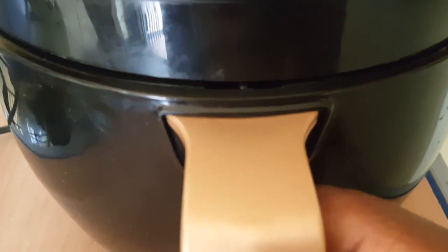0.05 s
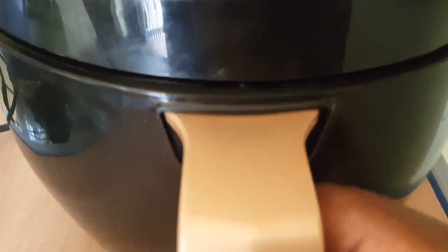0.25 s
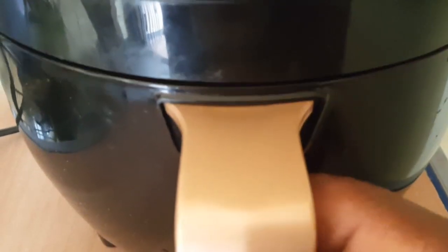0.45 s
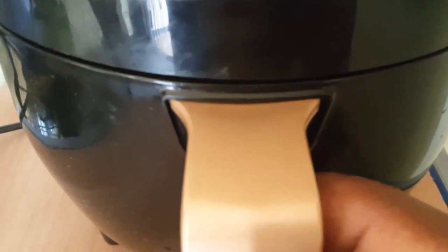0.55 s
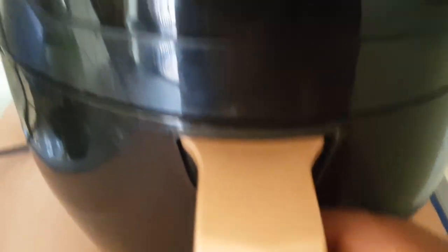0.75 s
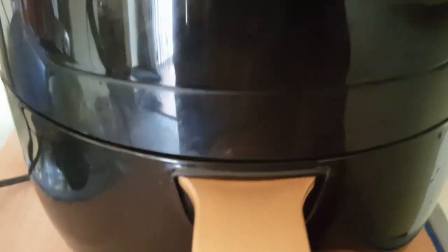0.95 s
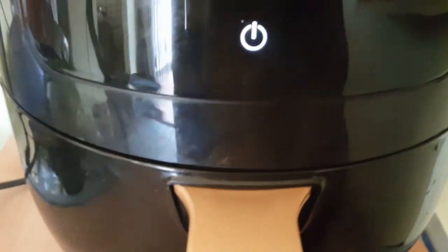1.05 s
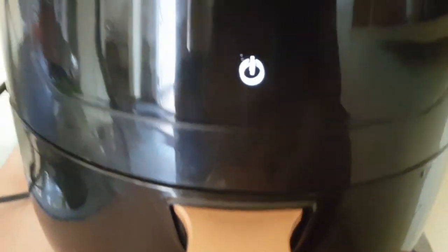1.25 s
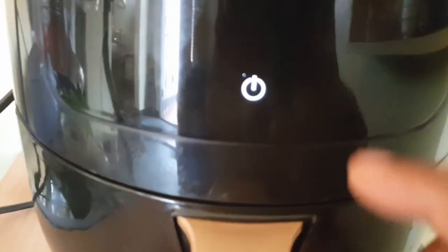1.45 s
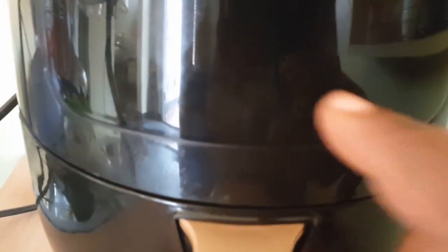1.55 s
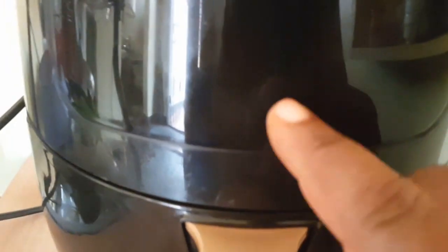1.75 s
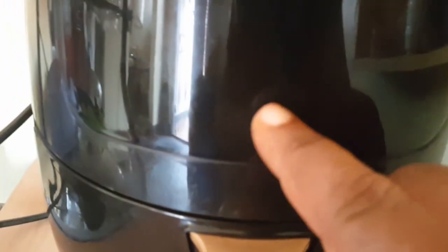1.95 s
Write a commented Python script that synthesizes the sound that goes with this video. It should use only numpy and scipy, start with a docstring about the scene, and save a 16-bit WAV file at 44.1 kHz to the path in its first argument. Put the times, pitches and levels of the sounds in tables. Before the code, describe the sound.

An air fryer basket is pushed shut close by in a small kitchen. A short scrape builds into one sharp plastic clack and thump at about 0.2 seconds, and the loose metal tray rattles for an instant. The sound dies away by about 0.6 seconds. Near quiet follows over a faint low rumble, with tiny plastic ticks around 0.7 and 1.2 seconds and a soft rustle around 1.2 seconds.

```python
"""In a small kitchen, an air fryer basket is pushed shut close to two microphones.
Stick-slip friction sounds on its rails, the latch snaps, and the basket's impact excites the damped
modes of the housing; the loose tray rattles briefly. The room reverberates over a quiet rumble.
Faint plastic ticks of handling follow, and a soft rustle of a sleeve or hand swells and fades."""
import sys
import numpy as np
from scipy import signal
from scipy.fft import rfft, irfft
from scipy.io import wavfile

SR = 44100
rng = np.random.default_rng(int(sys.argv[2]) if len(sys.argv) > 2 else 0)


def dump(signal):
    """Clip the signal to [-1, 1] and save it as 16-bit WAV at the path in sys.argv[1]."""
    limited = np.clip(np.atleast_2d(signal).T, -1, 1)
    pcm = np.round(limited * 32767).astype(np.int16)
    wavfile.write(sys.argv[1], SR, pcm)


N = 88200
T = np.arange(N) / SR
HZ = np.fft.rfftfreq(N, 1 / SR)

# Spectrum of the plastic's snaps and ticks. Each row: frequency in Hz, relative level in dB.
PLASTIC_SPECTRUM = [(150, -20), (450, -7.5), (1200, 1.5), (2500, 6), (4500, 3), (7000, 0), (9500, -16.5),
                    (12500, -6.5), (16000, -18)]


def amp(db):
    """Amplitude grows tenfold with every 20 dB."""
    return 10 ** (np.asarray(db) / 20)


def unit(x):
    """Normalisation to an rms of 1."""
    return x / np.sqrt(np.mean(x ** 2) + 1e-20)


def curve(points, hz=HZ):
    """Interpolation of a table on a logarithmic frequency axis."""
    f, value = np.transpose(points)
    return np.interp(np.log(hz + 1), np.log(f), value)


def envelope(points):
    """Amplitude over time, interpolated in decibels; silent outside the given times."""
    return amp(np.interp(T, *np.transpose(points), left=-120, right=-120))


def pan(db):
    """A left-right level difference, split evenly into two gains."""
    return amp(np.array([[.5], [-.5]]) * db)


def delay(x, seconds):
    """A pure delay sets the onset of a sound."""
    return np.pad(x, ((0, 0), (max(round(seconds * SR), 0), 0)))[:, :N]


def colour(x, db):
    """Minimum-phase filtering: folding the cepstrum makes a causal response with the given gains."""
    cepstrum = irfft(np.log(amp(db)), N)
    cepstrum[..., 1:N // 2] *= 2
    cepstrum[..., N // 2 + 1:] = 0
    response = np.atleast_2d(irfft(np.exp(rfft(cepstrum)), N))[:, :4096]
    return signal.fftconvolve(x, response, axes=1)[:, :N]


def noise(shape_db=0):
    """Partial coherence: noise at two microphones is alike in the bass, unrelated in the treble."""
    # Each row: frequency in Hz, coherence from 0 to 1.
    coherence = [(40, 0.97), (250, 0.9), (600, 0.7), (1200, 0), (4000, 0)]
    alike = np.clip(curve(coherence), 0, 1)
    left, independent = rfft(rng.standard_normal((2, N)))
    right = alike * left + np.sqrt(1 - alike ** 2) * independent
    return unit(irfft(np.array([left, right]) * amp(shape_db), N))


def fade(t60, t=T):
    """Exponential damping: a fall of 60 dB in t60 seconds."""
    return np.exp(-np.log(1000) * t / np.maximum(t60, 1e-3))


def ring(modes):
    """Free vibration is a sum of damped sinusoids, one for each mode."""
    return sum(pan(side_db) * amp(db) * fade(t60) * np.sin(2 * np.pi * hz * T)
               for hz, db, t60, side_db in modes)


def knock(spectrum, start, db, t60, tilt=0, side_db=0, crack=0):
    """An impact excites modes so dense that they merge into decaying noise; crack adds an impulse."""
    shape_db = curve(spectrum) + tilt * np.log2(np.maximum(HZ, 100) / 1000)
    cluster = noise() * fade(t60)
    impulse = crack * np.linalg.norm(cluster[0]) * (T == 0)
    burst = colour(cluster + impulse, shape_db)
    burst *= np.sqrt(2) / np.linalg.norm(burst)  # unit energy per channel, on average
    return delay(burst * amp(db) * pan(side_db), start)


def friction(spectrum, grain_db):
    """Stick-slip friction: tiny slips of random strength make a grainy noise."""
    grains = noise() * amp(grain_db * rng.exponential(1, N))
    return unit(colour(grains, curve(spectrum)))


def background(rumble_hz=70.4, half_width_hz=7.9):
    """Ambient noise: broadband room air, and a low rumble that wavers because its band is narrow."""
    # Each row: frequency in Hz, relative spectral density in dB.
    air_spectrum = [(25, -5), (50, -9), (75, -2.5), (110, -13.5), (150, -12), (240, -19.5), (305, -15),
                    (370, -20), (1020, -25.5), (1600, -27), (5000, -35.5), (10000, -42), (15000, -37.5)]
    # Each row: time in seconds, level in dB.
    rumble_levels = [(0, -65.5), (1.1, -70.5), (1.28, -57), (1.4, -72), (2, -66.5)]
    rumble = noise(-20 * np.log10(1 + ((HZ - rumble_hz) / half_width_hz) ** 2))
    air = amp(-63.5) * noise(curve(air_spectrum))
    return air + envelope(rumble_levels) * rumble


def slide(dull_hz=1400, full_bright_db=-40.5):
    """Sliding friction on the rails grows louder and brighter as the basket gathers speed."""
    # Each row: time in seconds, gain in dB.
    slide_gains = [(0, -55), (.04, -65), (.12, -66), (.15, -57), (.165, -49), (.185, -47), (.2, -41.5),
                   (.222, -40.5), (.24, -60)]
    # Each row: frequency in Hz, relative level in dB.
    rail_spectrum = [(90, -7), (200, 5.5), (360, -10), (530, -3), (660, -7.5), (810, -1), (1050, -6),
                     (1750, -5.5), (2100, -11), (3000, -15), (6000, -30), (16000, -56)]
    scrape = friction(rail_spectrum, grain_db=3)
    dull = colour(scrape, -20 * np.log10(1 + (HZ / dull_hz) ** 2))
    gain = envelope(slide_gains)
    brightness = np.minimum(gain / amp(full_bright_db), 1)
    return gain * (dull + brightness * (scrape - dull))


def latch(strike_s=.2286):
    """Impulsive excitation: the catch snaps over its notch and sets the front panel ringing."""
    # Each row: start in seconds, level in dB, t60 in seconds, tilt in dB per octave, left-right in dB.
    snaps = [(0.221, -17, 0.011, 5, -2), (0.2245, -2.5, 0.008, 2.5, 7), (0.2254, -7, 0.035, -3, 1),
             (0.229, 4.5, 0.027, -0.5, 0), (0.2327, -5, .045, -6, -1.5)]
    # Each row: frequency in Hz, level in dB, t60 in seconds, left-right in dB.
    panel_modes = [(1237, -31.5, 0.023, -0.5), (1591.6, -25, 0.056, 3.5), (3580, -21.5, 0.018, 0)]
    clicks = sum(knock(PLASTIC_SPECTRUM, *snap, crack=amp(-6.5)) for snap in snaps)
    return clicks + delay(ring(panel_modes), strike_s)


def slam(start, push_s=.0012, build_s=.0022):
    """The basket's impact excites dense shell modes, a clack, and sparse housing modes, a thump."""
    # Each row: frequency in Hz, level in dB, t60 in seconds, left-right in dB.
    housing_modes = [(132, -23, 0.37, 1), (181, -17, 0.14, 4), (227.7, -6.5, 0.076, 2),
                     (329.4, -26.5, 0.26, 1), (508.5, -17, .07, -2.5), (634.3, -24.5, .15, 0.5),
                     (806, -15.5, 0.12, 1.5), (984, -24.5, 0.094, 3.5), (1296, -16.5, 0.054, -4.5),
                     (1384, -16.5, 0.051, -5.5), (1533, -26.5, 0.086, -4.5)]
    # Each row: frequency in Hz, relative level in dB.
    shell_spectrum = [(100, -11.5), (270, -5.5), (420, -15), (540, 0.5), (1400, -1), (2200, -3),
                      (4000, -20.5), (8000, -35), (16000, -50)]
    clack = knock(shell_spectrum, start, db=7, t60=.053)
    thump = ring(housing_modes) * (1 - np.exp(-T / build_s))  # swells as the basket presses home
    return clack - delay(thump, start + push_s)


def room_boom(start):
    """Beating: two slowly decaying room modes, woken by the thump, lie a few hertz apart."""
    # The two frequencies in Hz.
    pair_hz = (180.6, 184.85)
    db, t60, side_db = -45.5, 1.46, 6.5
    return delay(ring([(hz, db, t60, side_db) for hz in pair_hz]), start)


def tray():
    """Repeated impact: the loose metal tray bounces, and each contact rings the same modes."""
    # Each row: start in seconds, level in dB, t60 in seconds, tilt in dB per octave, left-right in dB.
    bounces = [(.2660, -3.5, 0.11, -7, -0.5), (.2775, -4, 0.052, -3, -7.5), (.2820, -1.5, 0.055, -3.5, 7),
               (.2930, -8.5, 0.1, 1.5, -1.5), (.3050, -7.5, 0.074, -0.5, -1.5), (.3140, -4, 0.039, -6, -11),
               (.3210, -2.5, 0.054, -6, 10)]
    # Each row: frequency in Hz, relative level in dB.
    tray_spectrum = [(80, -18.5), (160, -6), (280, -4), (410, -15), (560, 1), (1300, 3), (2000, 3),
                     (2750, -3.5), (3400, -8.5), (7000, -25), (16000, -48)]
    # Each row: frequency in Hz, level in dB relative to the bounce, t60 in seconds, left-right in dB.
    tray_modes = [(575, -37, 0.087, 0), (1383, -33.5, 0.07, -1.5), (2350, -37, 0.065, 1.5),
                  (2526, -39.5, 0.13, -4.5), (2672, -39, 0.1, -3)]
    metal = ring(tray_modes)
    return sum(knock(tray_spectrum, start, db, *rest) + amp(db) * delay(metal, start)
               for start, db, *rest in bounces)


def ticks():
    """Heavily damped transients: faint, short plastic ticks and creaks of handling."""
    # Each row: start in seconds, level in dB.
    handling_ticks = [(.668, -53), (0.7009, -50.5), (1.133, -49), (1.168, -50), (1.2004, -48),
                      (1.2339, -50.5)]
    return sum(knock(PLASTIC_SPECTRUM, start, db, t60=.015) for start, db in handling_ticks)


def rustle(middle_s=1.2, half_length_s=.21):
    """Friction noise: a soft rustle of a sleeve or hand swells and fades."""
    # Each row: frequency in Hz, relative level in dB.
    rustle_spectrum = [(130, -7), (290, 7.5), (450, -6.5), (950, 2.5), (1150, -10.5), (2250, -4.5),
                       (2700, -12.5), (9000, -29)]
    swell = np.exp(-((T - middle_s) / half_length_s) ** 2)
    return amp(-69) * swell * friction(rustle_spectrum, grain_db=2)


def reverberation(x, rise_s=.004):
    """Diffuse reflections in the kitchen form a noise tail, each band dying at its own rate."""
    # Each row: frequency in Hz, t60 in seconds.
    decay_times = [(100, 0.56), (230, 0.27), (330, 0.5), (700, 0.4739), (2200, 0.3631), (5500, 0.3272),
                   (12000, 0.3)]
    # Each row: frequency in Hz, gain of the tail in dB.
    tail_gains = [(100, -14), (230, -12.5), (330, -6), (600, -9.5), (2000, -12), (6000, -10.5),
                  (14000, -17)]
    hz, t, bands = signal.stft(noise(), SR, nperseg=256)
    decay = fade(curve(decay_times, hz)[:, None], t) * (1 - np.exp(-t / rise_s))
    energy = (decay ** 2).sum(1, keepdims=True) * t[1] * SR
    decay *= amp(curve(tail_gains, hz))[:, None] / np.sqrt(energy)
    tail = signal.istft(bands * decay, SR, nperseg=256)[1]
    return signal.fftconvolve(x, tail, axes=1)[:, :N]


def scene(slam_s=.2375, radiation_hz=121):
    """Superposition of the direct sound, the room's response and the ambient noise."""
    # The right microphone is duller. Each row: frequency in Hz, left-right in dB.
    balance = [(200, 0), (1200, -.5), (3000, -2), (5000, 2), (6800, 7), (8000, 16), (10800, 14), (12300, 3),
               (16000, 4)]
    sources = slide() + latch() + ticks() + slam(slam_s) + tray() + rustle()
    # Small sources radiate little bass.
    radiation = signal.butter(N=3, Wn=radiation_hz, btype="high", fs=SR, output="sos")
    direct = signal.sosfilt(radiation, sources)
    room = reverberation(direct) + room_boom(slam_s)
    microphone_db = np.array([[.5], [-.5]]) * curve(balance)
    return colour(direct + room, microphone_db) + background()


def record(dry, cutoff_hz=15700):
    """Band limiting: a linear-phase low-pass filter removes the highest treble."""
    lowpass = signal.firwin(255, cutoff_hz, window=("kaiser", 9), fs=SR)
    return signal.oaconvolve(dry, lowpass[None], "same")


dry = scene()
out = record(dry)
dump(out)
```